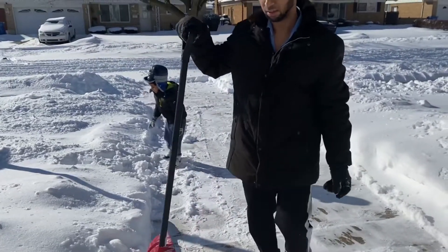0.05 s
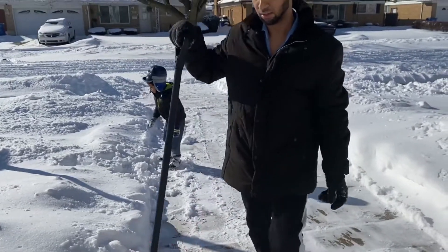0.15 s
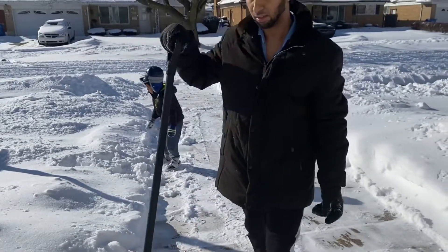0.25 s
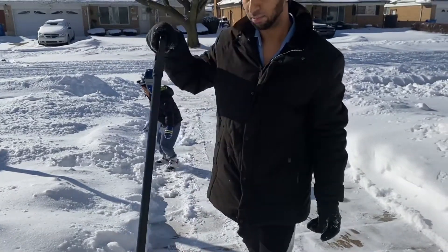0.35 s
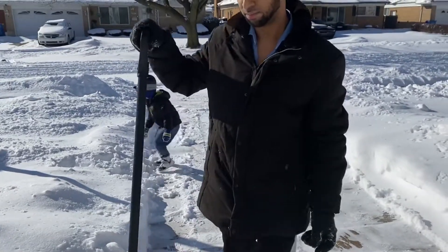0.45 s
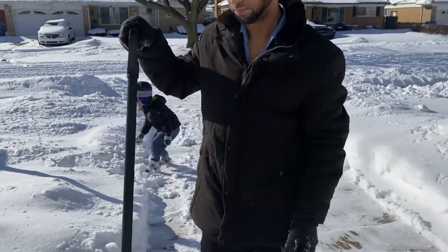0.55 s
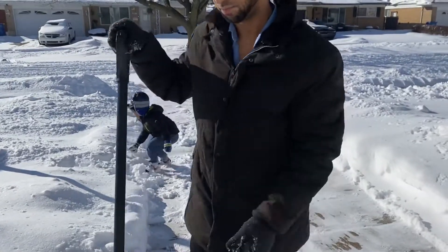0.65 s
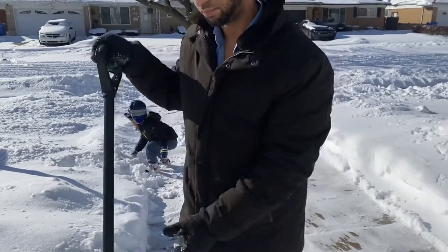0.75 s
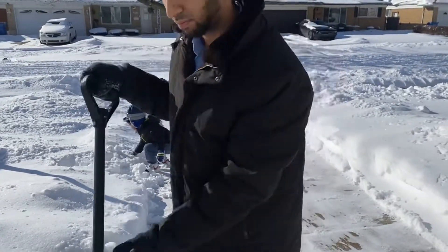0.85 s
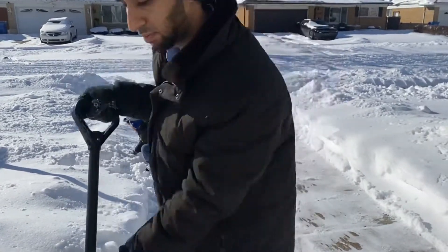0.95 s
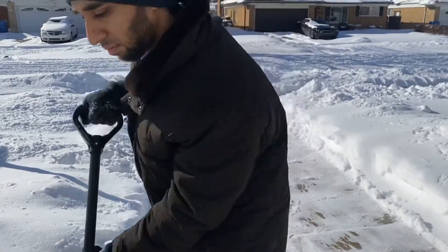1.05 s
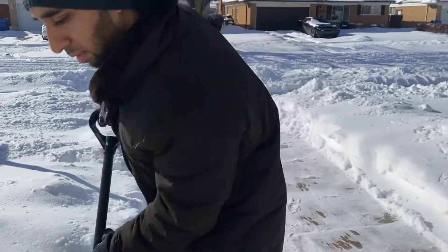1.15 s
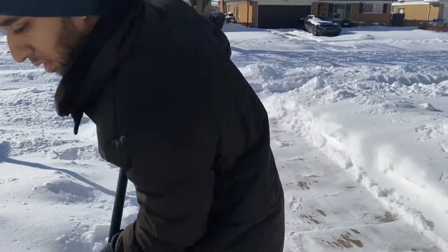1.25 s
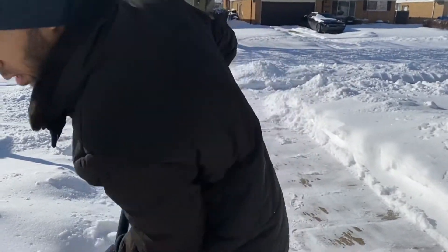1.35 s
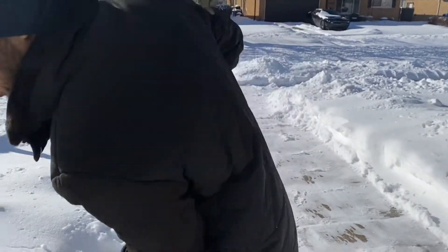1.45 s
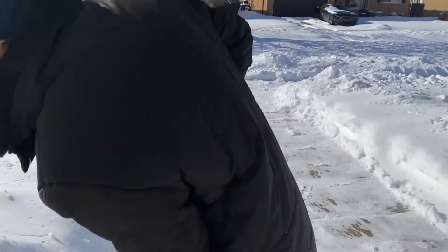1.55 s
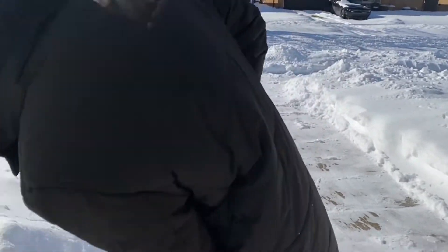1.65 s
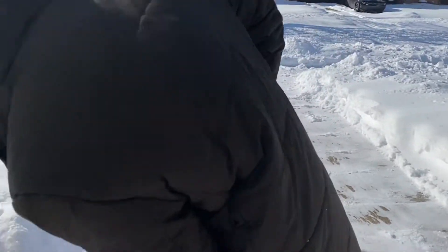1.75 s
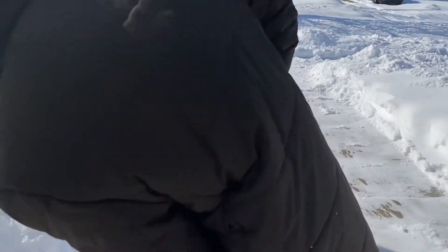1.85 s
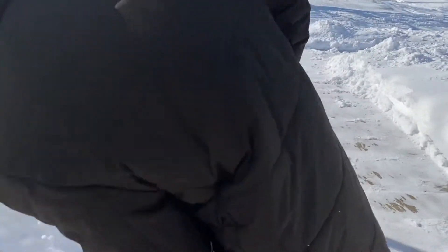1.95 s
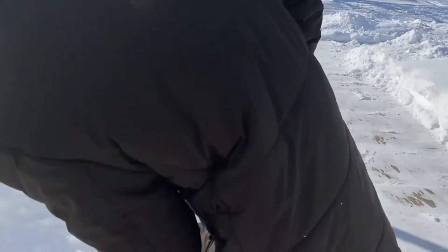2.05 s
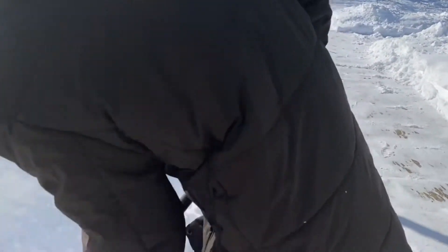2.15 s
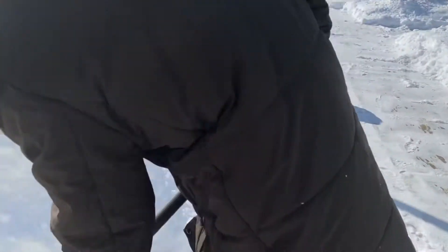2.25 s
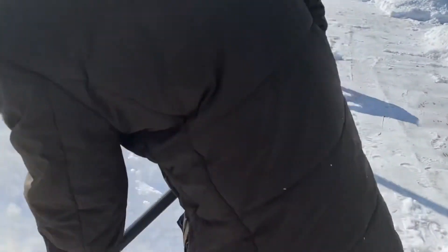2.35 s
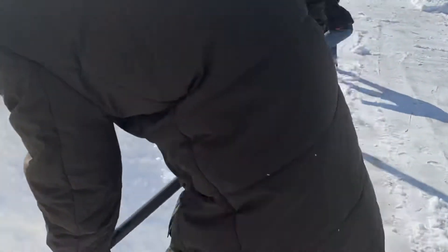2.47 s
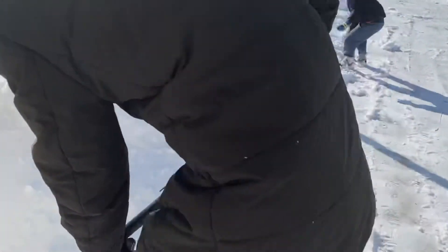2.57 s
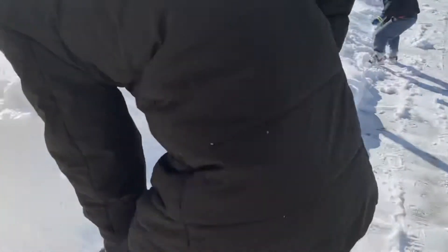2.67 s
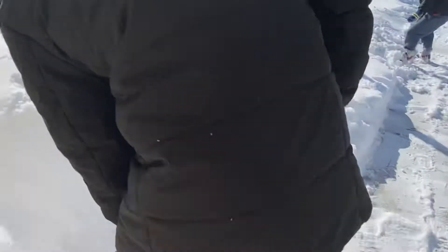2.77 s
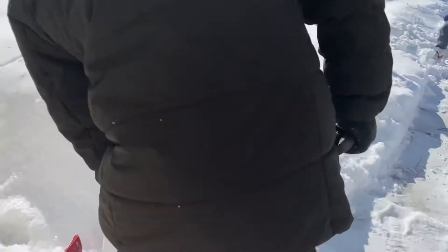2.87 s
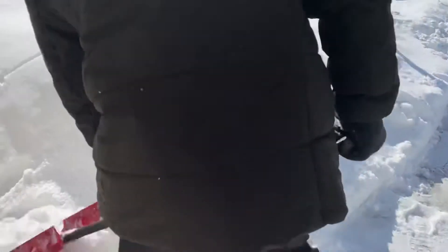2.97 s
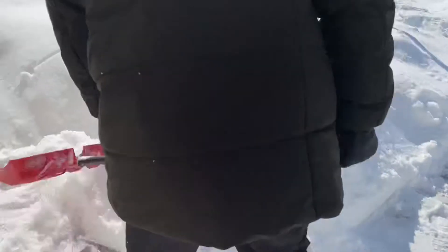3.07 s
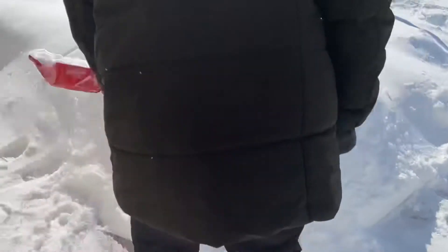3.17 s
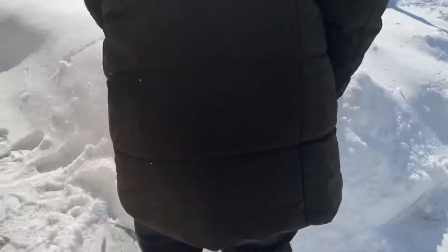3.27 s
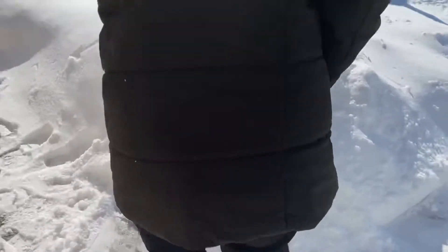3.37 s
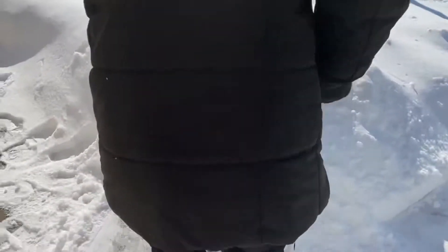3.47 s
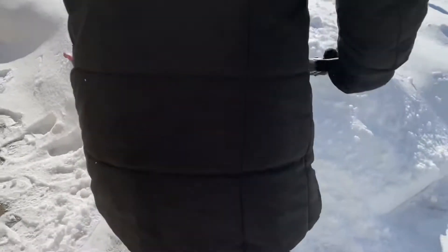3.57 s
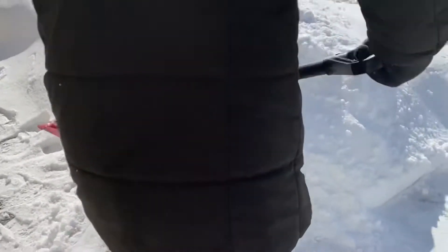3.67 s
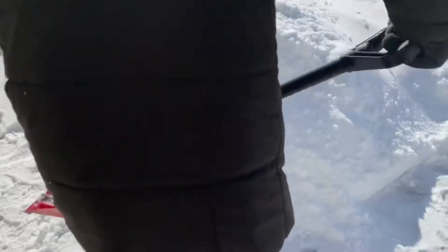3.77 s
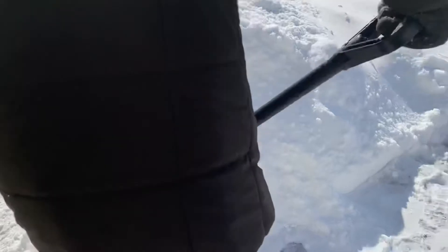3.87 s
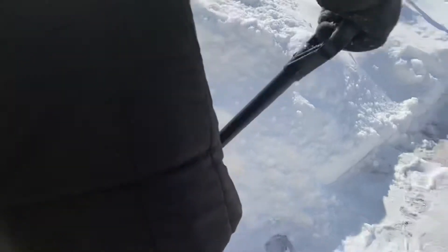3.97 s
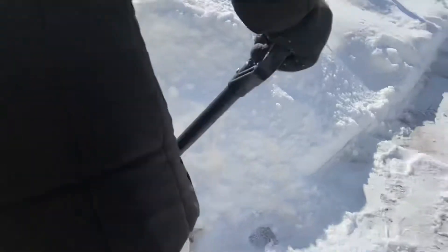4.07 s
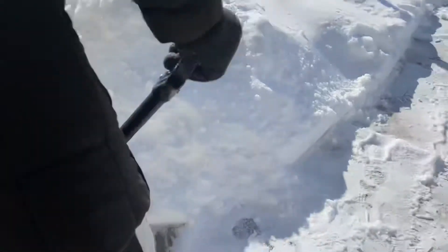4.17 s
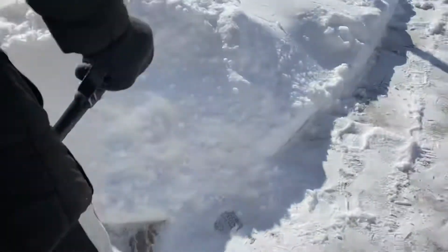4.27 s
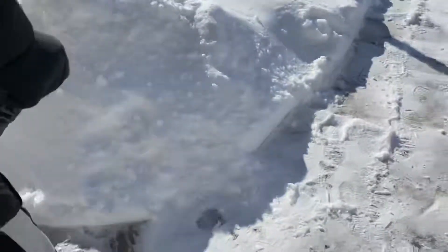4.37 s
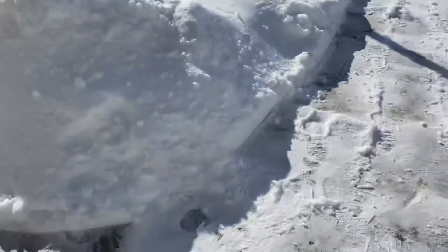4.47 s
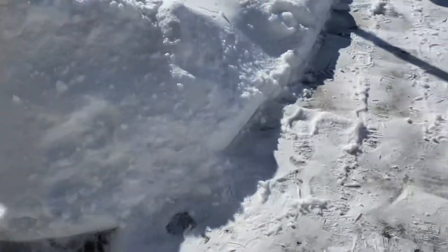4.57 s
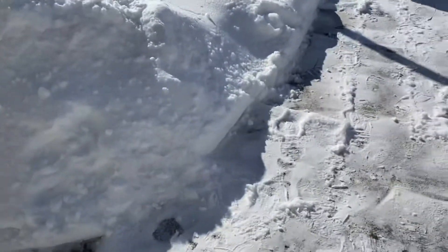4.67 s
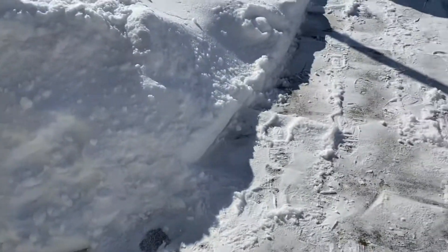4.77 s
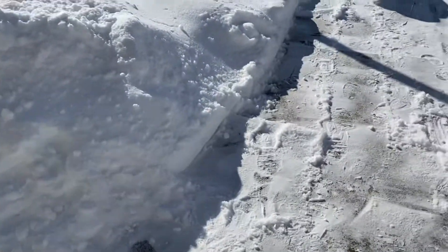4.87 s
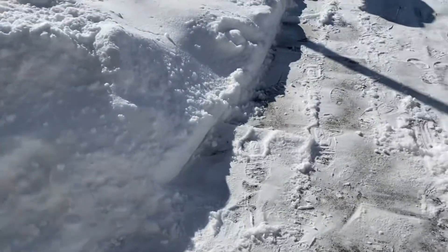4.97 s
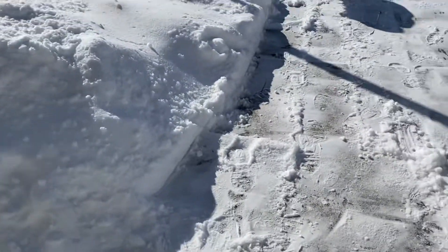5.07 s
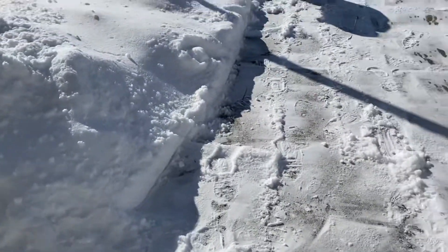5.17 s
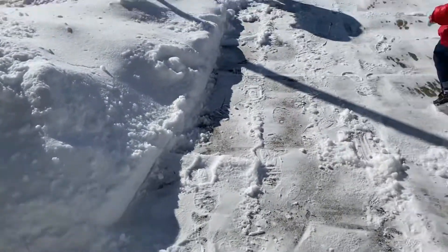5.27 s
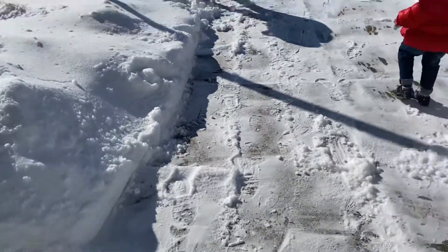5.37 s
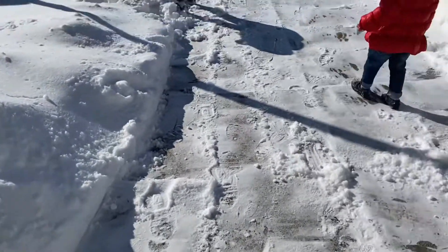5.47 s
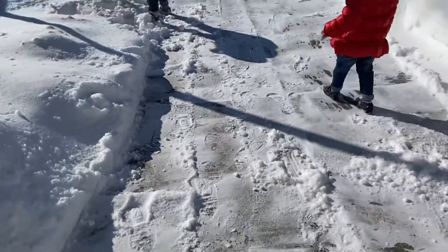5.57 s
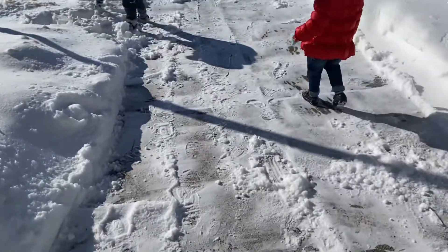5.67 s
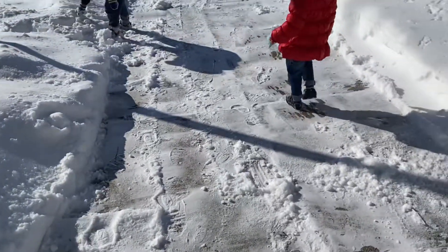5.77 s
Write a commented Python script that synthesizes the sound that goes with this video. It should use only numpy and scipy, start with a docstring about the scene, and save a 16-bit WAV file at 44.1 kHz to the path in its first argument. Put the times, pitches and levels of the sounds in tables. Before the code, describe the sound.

A plastic snow shovel bites and grinds over icy paving in four separate strokes, loud and close, leaning toward the left. Before and between them come faint snow and cloth swishes, small ice ticks, dull knocks and low wind puffs on the microphone. A faint, steady street hiss lies behind, with slight reflections from the open surroundings.

```python
"""A dull knock, a swish of snow or cloth and a soft gust thump come first; then a plastic shovel drops on,
and is pushed over, a snowy paved drive close to a hand-held microphone pair.
Random catches of grit and ice excite the damped resonances of the hollow blade, beside filtered grit and fizz.
Knocks are short decaying sines; snow and cloth are clumped grains; wind is slowly modulated low noise with
swelling thumps; a quiet street is steady filtered noise behind."""
import sys
import numpy as np
from scipy import signal
from scipy.fft import rfft, irfft, next_fast_len
from scipy.io import wavfile

SR = 44100
rng = np.random.default_rng(int(sys.argv[2]) if len(sys.argv) > 2 else 0)


def store_pcm(level_fs):
    """Save levels as 16-bit WAV."""
    pcm = np.round(np.clip(level_fs, -1, 1) * 32767).astype(np.int16)
    wavfile.write(sys.argv[1], SR, np.atleast_2d(pcm).T)


N = 256662
TIME_S = np.arange(N) / SR
HZ = np.maximum(np.fft.rfftfreq(next_fast_len(N), 1 / SR), 1)   # FFT bins, kept above 0 for the logarithm

# In every spectrum below, density_db is relative power per Hz: the coloured noise is rescaled to rms 1.
# Sliding force of the edge, one list a stroke: time_s, low_db, hollow_above_low_db, grit_above_low_db
SLIDE_STROKES = [
    [(0.849, -6.5, -10, -1.5), (0.881, -13.5, 3, -8), (0.915, -15.5, -7.5, -8), (0.955, -23, -21, -31),
     (0.973, -22.5, -5, -2), (1.033, -33, -15, -22), (1.07, -43, -20, -35)],
    [(1.456, -14.5, -3, -7), (1.486, -6, -6.5, -12), (1.55, -10, -6, -13), (1.574, -20, -5, -12.5),
     (1.768, -25, -3.5, -10.5), (1.8, -19, -6.5, -17.5), (1.888, -20, -4, -11), (1.928, -12.5, -7, -12),
     (2.014, -15.5, -9, -16.5), (2.04, -11.5, -5.5, -12), (2.19, -13, -5.5, -11.5),
     (2.286, -21.5, -7, -8.5), (2.328, -44, -4, 0), (2.43, -30.5, -8, -17.5), (2.48, -58, -9, -10)],
    [(3.919, -12.5, -1, -15), (3.97, -14, -7.5, -17), (4.0, -12, -1, -8.5), (4.109, -11.5, -5, -9.5),
     (4.169, -15.5, -7, -18), (4.2, -22, -8, -10.5), (4.231, -32, -1, -5), (4.31, -19, -6.5, -10.5),
     (4.367, -14.5, -8.5, -13), (4.445, -33, -6, -11.5), (4.5, -29.5, -11, -16), (4.56, -57, 0, -5)],
    [(5.632, -24.5, -0.5, -19), (5.674, -15.5, -6, -19), (5.72, -16.5, -5.5, -15.5),
     (5.762, -23.5, -5, -12.5), (5.82, -22.5, -5.5, -11)],
]
# Colour of each stroke: load_above_low_db, fizz_above_grit_db
STROKE_COLOUR = [(-14.5, -10), (-20.5, -9.5), (-7.5, -9.5), (-14.5, -15.5)]
# The edge bites into ice or paving: start_s, low_db, hollow_above_low_db, grit_above_low_db, t60_s
EDGE_BITES = [(0.85, 3.5, -6.5, -3, 0.016), (0.917, -7.5, -24, -4, 0.012), (0.965, -10, -5, -17, 0.078),
              (1.465, -4, 3.5, -8, 0.03), (1.487, -4, 0, 4.5, 0.092), (1.602, -10, -3, -0.5, 0.13),
              (1.639, -8.5, 9, -21, 0.02), (1.761, -5.5, -5, -6, 0.017), (1.797, -10, -12, -34, 0.055),
              (1.929, 2.5, -3.5, -12, 0.042), (2.213, -13.5, -10, 1, 0.037), (3.919, 4, 1, -19, 0.06),
              (3.987, -1.5, -1, -12.5, 0.15), (4.036, 1, 4.5, -1, 0.024), (4.264, -13.5, 0, -13, 0.039),
              (4.295, -4.5, -5, -14, 0.15), (4.351, -13, -19, -9, 0.047), (5.633, -19, -2, -35, 0.034),
              (5.664, -26, -14, -32, 0.064), (5.705, 2, -14, -19, 0.08)]
# Chips of ice and grit snap off: start_s, level_db, fizz_above_level_db
ICE_CHIPS = [(0.946, -20, -22), (1.313, -41, -19), (1.345, -36, -18), (1.5854, -16, 17.5), (1.7065, -16, 5),
             (1.8431, -14.5, 9), (1.9103, -16, -14), (1.9574, -5, -4), (1.9754, -25, -21), (2.0233, -12, 0),
             (2.0497, -16, 0), (2.251, -9, -3), (2.2722, -6, -10), (2.6653, -37.5, 10), (2.796, -14.5, -3),
             (2.799, -12.5, -25), (3.5124, -35, -25), (5.0768, -36.5, 12.5), (5.2273, -35, -31),
             (5.445, -43.5, 17)]
# Damped resonances of the blade: pitch_hz, width_hz, level_db
BLADE_MODES = [(274.3, 48, -15.5), (322.4, 45, -7), (382, 104, -7), (481.7, 43.4, -10), (545, 55, -15.5),
               (663.3, 36, -7), (729, 97, -5.5), (807.4, 101, -4), (974, 91, -10), (1087, 74, -10),
               (1215, 72, -18), (1312, 110, -10.5), (1356, 180, -12.5), (1704, 27, -13), (1810, 50, -16.5),
               (2080, 150, -7.5), (2490, 114, -16.5), (2695, 116, -12.5), (3116, 200, -13),
               (3436, 340, -12.5), (4045, 270, -16.5), (4610, 250, -17)]
# Grit under the edge: frequency_hz, density_db
GRIT_SPECTRUM = [(700, -16), (1400, 13.5), (2300, 6), (3900, -17), (5500, -1.5), (7000, -14), (9000, -33)]
# Finest grit, also the hiss of snow and cloth: frequency_hz, density_db
FIZZ_SPECTRUM = [(4500, -5), (6500, -5), (8500, 4), (11000, 0), (15500, -5)]
# Snow thudding in the scoop: frequency_hz, density_db
LOAD_SPECTRUM = [(80, -41), (140, 3), (200, 9), (250, 13), (400, -45)]
# Phase lead of the shovel on the left, one row a stroke: full_turn_hz, steepness (exponent)
LEFT_LEAD = [(4600, 2.0), (4000, 1.6), (2600, 1.7), (3300, 1.0)]
# Echoes from snow banks and house fronts: delay_s, level_db
ECHOES = [(.011, -15), (.034, -20), (.071, -25)]
# Dull single knocks of the shovel: start_s, level_db, settled_pitch_hz, decay_cycles
KNOCKS = [(0.078, -10, 940, 1), (1.603, -2.5, 970, 1.7), (1.76, -7, 740, 1.9), (2.73, -18, 775, 1.4),
          (3.377, -20, 900, 1.2), (3.408, -14.5, 1240, 1), (3.481, -13.5, 700, 1.44), (3.514, 2, 815, 0.89),
          (3.904, -6, 750, 1.1), (3.919, -2.5, 990, 4.0), (4.666, -32, 834, 1.6), (5.044, -32, 740, 1.7),
          (5.198, -30, 1400, 3.6)]
# Soft bed of snow and cloth, in runs of points: time_s, crisp_db, hiss_above_crisp_db
RUSTLE_BED = [
    [(0.0, -45, -9), (0.022, -64, -32), (0.39, -63.5, -6), (0.504, -57.5, 3.5), (0.83, -47, -3.5)],
    [(1.08, -61, -11), (1.108, -51, -8), (1.182, -60, -4), (1.352, -60, 0), (1.44, -46.5, -4)],
    [(2.5, -59, -6), (2.684, -60.5, 3.5), (3.278, -51, -8.5), (3.63, -63, -11), (3.89, -66, 4)],
    [(4.55, -46.5, -5), (4.854, -57, -6), (5.028, -58, 1), (5.274, -64, -12), (5.6, -54, -8)],
]
# Separate swishes: full_level_s, rise_s, hold_s, crisp_db, dull_above_crisp_db, hiss_above_crisp_db
SWISHES = [(0.071, 0.015, 0.0043, -54, 20, -27), (.161, .003, 0.046, -39, -14, -25),
           (0.256, 0.0079, 0.033, -49, -1, -32), (0.77, 0.12, 0.08, -64, 13, -13),
           (1.314, .005, 0.033, -49.5, 4.5, -20), (1.39, .01, 0.034, -67, 18, -18),
           (2.717, 0.026, 0.026, -47.5, 11.5, -10), (2.795, 0.029, 0.0043, -31, 2.5, -16),
           (3.057, 0.084, 0.03, -55, -19, 2), (3.182, 0.011, 0.048, -52, 7, -24.5),
           (3.323, 0.088, 0.056, -58.5, 9.5, 9), (3.408, 0.016, 0.0061, -47, 12.5, -19),
           (3.505, .005, 0.013, -53.5, 20, -28), (3.848, 0.067, 0.11, -61.5, 12, -10),
           (4.662, 0.0054, 0.018, -62.5, 19.5, -19), (4.925, .005, 0.034, -61, 11, 4),
           (5.556, 0.0082, 0.022, -51.5, 13, -12), (5.625, 0.037, .01, -48, 11, -24)]
# Crisp part of the rustle: frequency_hz, density_db
CRISP_SPECTRUM = [(800, -17), (1400, 5.5), (1800, 6.5), (2400, 2), (3300, -1), (5000, -6.5), (8000, -17.5),
                  (15000, -22)]
# Dull part of the rustle: frequency_hz, density_db
DULL_SPECTRUM = [(250, -3.5), (500, 0.5), (900, -1.5), (1400, -6), (2500, -70)]
# Wind on the ports, in runs of points: time_s, rumble_db, flutter_above_rumble_db
WIND_LEVELS = [
    [(0.0, -31, 0.5), (0.568, -44.5, -0.5), (0.684, -35, -2.5), (0.746, -45, 2.5), (0.862, -33.5, -12),
     (0.89, -49, 2), (1.05, -33, -1), (1.218, -41.5, 6), (1.44, -34.5, -2.5)],
    [(1.9, -55, 15), (1.948, -45, 11), (2.514, -51.5, 6), (2.952, -23, -13), (3.086, -37, -2),
     (3.212, -22.5, -9), (3.302, -37.5, -9.5), (3.518, -31.5, -2.5), (3.89, -40.5, -7.5)],
    [(4.05, -37, 14), (4.276, -52, -1), (4.306, -36, 1.5), (5.202, -30, -2), (5.336, -49, 2),
     (5.38, -38, -2.5), (5.612, -46, -1), (5.69, -37, -2), (5.82, -56, 8)],
]
# Deep layer of the wind: frequency_hz, density_db
RUMBLE_SPECTRUM = [(20, -25), (40, -7), (60, 11.5), (100, 4), (150, -4), (400, -48)]
# Higher layer of the wind: frequency_hz, density_db
FLUTTER_SPECTRUM = [(70, 1.5), (130, 4), (230, 0.5), (350, -6), (550, -17), (1000, -54.5)]
# The strongest gust thumps: start_s, level_db, pitch_hz
GUST_THUMPS = [(0.071, -17, 210), (0.268, -18, 250), (0.314, -33, 198), (0.389, -31, 178),
               (0.662, -18.5, 85), (1.276, -30, 198), (1.328, -21.5, 182), (2.66, -26, 194),
               (2.797, -18.5, 151), (2.835, -15.5, 122), (2.89, -12, 129), (2.947, -12, 100),
               (3.148, -20, 102), (3.183, -13, 61.3), (3.26, -20, 113), (3.471, -18.5, 173),
               (3.437, -23.5, 125), (3.534, -23, 129), (3.65, -21, 147), (4.49, -15, 252),
               (4.621, -29, 200), (4.687, -7, 225), (4.785, -15.5, 178), (4.805, -15.5, 205),
               (4.916, -19.5, 77.4), (4.958, -24, 198), (5.05, -13, 297), (5.112, -23, 101)]
# Hiss of the street: frequency_hz, density_db
STREET_SPECTRUM = [(150, -18), (300, -2), (700, -5.5), (1500, -15), (3500, -30), (7000, -28), (10000, -36)]
# Phase between the microphone ports: frequency_hz, left_lead_half_turns
PORT_PHASE = [(0, 0), (6600, 0), (8350, -1), (10200, -2), (12050, -3), (13900, -4), (15800, -5)]
# Level between the ports: frequency_hz, left_over_right_db
PORT_BALANCE = [(60, 2.5), (150, -1), (380, 1.5), (950, 2), (2380, 1), (5980, 3), (15000, -1.5)]
# Likeness of the two sides: frequency_hz, likeness (0 to 1)
LIKENESS = [(60, 0.47), (250, 0.85), (600, 0.68), (1700, 0.38), (4000, 0.38), (6000, 0.41), (8000, 0.84),
            (15000, 1)]

BOWL_TOP_HZ, HOLLOW_TOP_HZ = 610, 1500   # borders of the blade's low, middle and edge resonances
BLOW_DB = 10.5   # opening blow of a bite or chip, above its tabled level
CREST_DB = 13   # the catches after a blow start this far under the tabled level
CHIP_T60_S = .022
BITE_FIZZ_DB = -4.5   # fizz of a bite above its grit
DULL_DB = -6   # dull part of the rustle bed above its crisp part
SWISH_FADE_DB_PER_S = 424
THUMP_CYCLES = 0.82   # cycles until a thump is fully swollen
THUMP_SIDE = .7   # largest unshared share of a thump
STREET_DB = -48
LOW_CUT_HZ, CUTOFF_HZ = 41, 15800   # the microphones lose the deepest bass and the top
CEILING = 1.0   # amplitude where peaks saturate


def shovel():
    """Forced vibration: sliding, bites and chips drive the blade, grit and fizz; sliding stirs the load."""
    bowl_db, hollow_db, grit_db = in_time(SLIDE_STROKES)
    load_db, fizz_db = stroke_colours()
    sliding = stroke_gate()
    judder, crunch = drift(36.0), drift(91)   # the edge sticks and slips on the rough paving

    start_s, low_db, middle_db, bright_db, t60_s = np.transpose(EDGE_BITES)
    chip_s, chip_db, chip_fizz_db = np.transpose(ICE_CHIPS)
    every_s = np.r_[start_s, chip_s]
    every_t60_s = np.r_[t60_s, np.full(len(ICE_CHIPS), CHIP_T60_S)]
    bite_grit_db = low_db + bright_db
    hit_grit_db = np.r_[bite_grit_db, chip_db]
    hit_fizz_db = np.r_[bite_grit_db + BITE_FIZZ_DB, chip_db + chip_fizz_db]
    bowl, bowl_blows = dying(zip(start_s, low_db, t60_s))
    hollow, hollow_blows = dying(zip(start_s, low_db + middle_db, t60_s))
    grinding, edge_blows = dying(zip(every_s, hit_grit_db, every_t60_s))
    fizzing, _ = dying(zip(every_s, hit_fizz_db, every_t60_s))

    bowl += sliding * from_db(bowl_db + 1.1 * judder)
    hollow += sliding * from_db(bowl_db + hollow_db + 1.2 * judder + 0.34 * crunch)
    grinding += sliding * from_db(bowl_db + grit_db + 0.93 * judder + 2.1 * crunch)
    fizzing += sliding * from_db(bowl_db + grit_db + fizz_db + 0.25 * judder + 1.85 * crunch)

    catches = grains(2500, spread_db=3.0)
    fine = grains(9000, spread_db=3.5)
    bowl_force = catches * bowl + bowl_blows
    hollow_force = catches * hollow + hollow_blows
    edge_force = fine * grinding + edge_blows
    body = blade(bowl_force, hollow_force, edge_force)
    grit = from_db(-3) * coloured(fine, GRIT_SPECTRUM) * grinding
    fizz = coloured(fine, FIZZ_SPECTRUM) * fizzing
    load_level = sliding * from_db(bowl_db + load_db + 2.0 * judder)
    load = coloured(noise(), LOAD_SPECTRUM) * load_level
    return body + grit + fizz + load


def blade(bowl, hollow, edge):
    """Modal resonance: damped modes ring under the force, each driven unevenly as the contact point wanders."""
    out = 0
    for k, (pitch_hz, width_hz, level_db) in enumerate(BLADE_MODES):
        force = bowl if pitch_hz < BOWL_TOP_HZ else hollow if pitch_hz < HOLLOW_TOP_HZ else edge
        radius = np.exp(-np.pi * width_hz / SR)   # a wider resonance dies sooner
        sign = (-1) ** k
        # noise of rms 1 comes out at about level_db
        gain = from_db(level_db) * (1 - radius ** 2) / 2 * sign / np.sqrt(width_hz / SR)
        poles = [1, -2 * radius * np.cos(2 * np.pi * pitch_hz / SR), radius ** 2]
        uneven_force = force * from_db(1.9 * drift(25))
        out = out + signal.lfilter([gain, 0, -gain], poles, uneven_force + 1e-18)
    return out


def stroke_gate():
    """Contact gating: sliding force exists only during a stroke, with short ramps at its ends."""
    gate = 0
    for stroke in SLIDE_STROKES:
        first_s, last_s = stroke[0][0], stroke[-1][0]
        gate = gate + np.interp(TIME_S, [first_s - .002, first_s, last_s, last_s + .03], [0, 1, 1, 0])
    return gate


def stroke_colours():
    """Spectral balance: load and fizz levels are constant in a stroke and interpolated between strokes."""
    held = [[(stroke[0][0], *colour), (stroke[-1][0], *colour)]
            for stroke, colour in zip(SLIDE_STROKES, STROKE_COLOUR)]
    return in_time(held)


def dying(rows):
    """Impact and exponential decay: envelopes of the catches after each hit, and its single opening blow."""
    envelope, blows = np.zeros((2, N))
    for start_s, level_db, t60_s in rows:
        start = round(start_s * SR)
        t = np.arange(min(SR // 4, N - start)) / SR
        envelope[start:][:len(t)] += from_db(level_db - CREST_DB - 60 * t / max(t60_s, .004))
        blows[start] = from_db(level_db + BLOW_DB)
    return envelope, blows * [[1], [.3]]   # shared and unshared part


def add_echoes(near):
    """Reflection: delayed, low-passed copies with shared and unshared parts exchanged join the direct sound."""
    dull = signal.lfilter([.25], [1, -.75], near[::-1])
    for delay_s, level_db in ECHOES:
        delay = round(delay_s * SR)
        near[:, delay:] += from_db(level_db) * dull[:, :-delay]
    return near


def from_the_left(sound):
    """Interaural phase: the left side leads by a frequency-dependent phase that is set anew at each stroke."""
    edges = [0] + [round((stroke[0][0] - .02) * SR) for stroke in SLIDE_STROKES[1:]] + [N]
    out = sound.copy()
    for start, end, (full_turn_hz, steepness) in zip(edges, edges[1:], LEFT_LEAD):
        turns = np.minimum(HZ / full_turn_hz, 1) ** steepness
        out[0, start:end] = shaped(sound[0], np.exp(2j * np.pi * turns))[start:end]
    return out


def taps():
    """Heavily damped vibration: a knock rises fast, sags in pitch and dies after a few cycles."""
    out = np.zeros(N)
    for start_s, level_db, pitch_hz, cycles in KNOCKS:
        turns = np.arange(SR // 50) * pitch_hz / SR
        decay = (1 - np.exp(-turns / 0.44)) * np.exp(-(turns / cycles) ** 1.53)
        sagging = turns + 0.11 * (1 - np.exp(-turns / 0.19))
        knock = from_db(level_db) * decay * np.sin(2 * np.pi * sagging)
        out[round(start_s * SR):][:len(turns)] += knock
    return out * [[1], [.35]]   # shared and unshared part


def rustle():
    """Granular friction: clumped grains and a treble hiss form a soft bed, and swishes that rise, hold and fade."""
    bed_db, bed_hiss_db = in_time(RUSTLE_BED)
    crisp, dull, hiss = from_db([bed_db, bed_db + DULL_DB, bed_db + bed_hiss_db])
    for full_s, rise_s, hold_s, crisp_db, dull_db, hiss_db in SWISHES:
        rise = np.clip(1 + (TIME_S - full_s) / rise_s, 0, 1) ** 2
        fade_db = SWISH_FADE_DB_PER_S * np.maximum(TIME_S - full_s - hold_s, 0)
        swish = rise * from_db(crisp_db - fade_db)
        crisp = crisp + swish
        dull = dull + swish * from_db(dull_db)
        hiss = hiss + swish * from_db(hiss_db)
    clumps = from_db(1.7 * drift(23))
    crisp_grains = crisp * coloured(grains(9000, spread_db=3.0), CRISP_SPECTRUM)
    dull_grains = dull * coloured(grains(3000, spread_db=-1.0), DULL_SPECTRUM)
    treble = hiss * from_db(1.6 * drift(15.7)) * coloured(noise(), FIZZ_SPECTRUM)
    return clumps * (crisp_grains + dull_grains) + treble


def wind():
    """Turbulent pressure: two lumpy layers of low noise share their gusts, with single thumps on top."""
    rumble_db, flutter_db = in_time(WIND_LEVELS)
    lumps = drift(17.6)
    rumble = coloured(noise(), RUMBLE_SPECTRUM) * from_db(rumble_db + 0.5 * lumps)
    flutter_level = from_db(rumble_db + flutter_db + 5.2 * lumps + 2.55 * drift(30))
    flutter = coloured(noise(), FLUTTER_SPECTRUM) * flutter_level
    return rumble + flutter + thumps()


def thumps():
    """Pressure pulse: a soft push swells and dies in a few cycles, with random phase and unshared part."""
    out = np.zeros((2, N))
    chances = rng.random((len(GUST_THUMPS), 2))
    for (start_s, level_db, pitch_hz), (phase, side) in zip(GUST_THUMPS, chances):
        turns = np.arange(SR // 8) * pitch_hz / SR
        age = turns / THUMP_CYCLES
        swell = age * np.exp(.5 - .5 * age ** 2)   # reaches 1 at age 1
        push = from_db(level_db) * swell * np.sin(2 * np.pi * (turns + phase))
        out[:, round(start_s * SR):][:, :len(turns)] += push * [[1], [THUMP_SIDE * (2 * side - 1)]]
    return out


def background():
    """Stationary noise: the street is a steady coloured hiss."""
    return from_db(STREET_DB) * coloured(noise(), STREET_SPECTRUM)


def pair(two):
    """Partial coherence: mixes a shared and an unshared signal into left and right of the tabled likeness."""
    in_step = np.cos(2 * np.pi * np.interp(HZ, *np.transpose(PORT_PHASE)))   # most alike in or against phase
    alike = np.clip(at_hz(LIKENESS) + 0.11 * in_step * (HZ > PORT_PHASE[1][0]), 0, 1)
    shared, unshared = shaped(two, np.sqrt([1 + alike, 1 - alike]) / np.sqrt(2))
    return np.array([shared + unshared, shared - unshared])


def from_db(db):
    """Logarithmic level: amplitude gain of a level in dB."""
    return 10 ** (np.asarray(db) / 20)


def rms_one(x):
    """Normalisation: x scaled to rms 1."""
    return x / np.sqrt(np.mean(x ** 2) + 1e-20)


def noise():
    """White noise: two independent Gaussian signals."""
    return rng.standard_normal((2, N))


def in_time(tables):
    """Linear interpolation: value columns of joined (time_s, value, ..) tables at every sample."""
    time_s, *columns = np.concatenate(tables).T
    return [np.interp(TIME_S, time_s, column) for column in columns]


def at_hz(points):
    """Interpolation over log frequency: a (frequency_hz, value) table at every FFT bin."""
    hz, value = np.transpose(points)
    return np.interp(np.log(HZ), np.log(hz), value)


def shaped(x, response):
    """Linear filtering: the spectrum of x times a frequency response."""
    size = next_fast_len(N)
    return irfft(rfft(x, size) * response, size)[..., :N]


def coloured(x, spectrum):
    """Spectral shaping: x filtered by a tabled spectrum, rms 1."""
    return rms_one(shaped(x, from_db(at_hz(spectrum))))


def drift(rate_hz):
    """Low-passed noise: a slow random wander of rms 1, made at a twentieth of the sample rate."""
    r = np.exp(-40 * np.pi * rate_hz / SR)
    slow = signal.lfilter([1], [1, -2 * r, r * r], rng.standard_normal(N // 20 + 2002))
    slow = slow[2000:]   # drop the filter's start-up
    return np.interp(np.arange(N) / 20, np.arange(len(slow)), rms_one(slow))


def grains(per_s, spread_db):
    """Random impulse process: two unrelated trains of clicks of uneven size and sign, rms 1."""
    levels_db = spread_db * np.minimum(rng.exponential(1, (2, N)), 4)
    sizes = from_db(levels_db) * rng.choice([-1, 1], (2, N))
    return rms_one(sizes * (rng.random((2, N)) < per_s / SR))


def scene():
    """Superposition: the echoing shovel on the left, plus knocks, rustle, wind and street."""
    near = add_echoes(shovel())
    around = taps() + rustle() + wind() + background()
    return from_the_left(pair(near)) + pair(around)


def record(dry):
    """Transducer response: bass is lost, the ports differ in phase and level, peaks saturate, the top is cut."""
    lead = np.pi * np.interp(HZ, *np.transpose(PORT_PHASE))
    half = np.exp(.5j * lead) * from_db(at_hz(PORT_BALANCE) / 2)   # half the difference on each side
    bass_filter = signal.butter(2, LOW_CUT_HZ, "high", fs=SR, output="sos")
    ports = shaped(signal.sosfilt(bass_filter, dry), np.array([half, 1 / half]))
    clipped = ports / (1 + np.abs(ports / CEILING) ** 12) ** (1 / 12)
    top_filter = signal.ellip(12, .5, 60, CUTOFF_HZ, fs=SR, output="sos")
    return signal.sosfilt(top_filter, clipped)


dry = scene()
out = record(dry)
store_pcm(out)
```